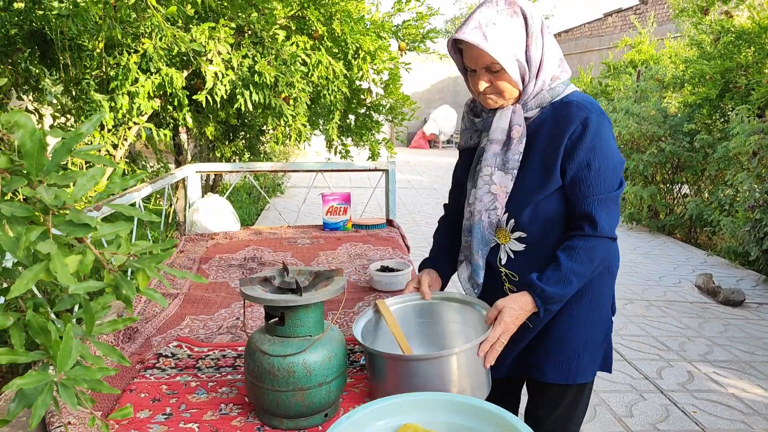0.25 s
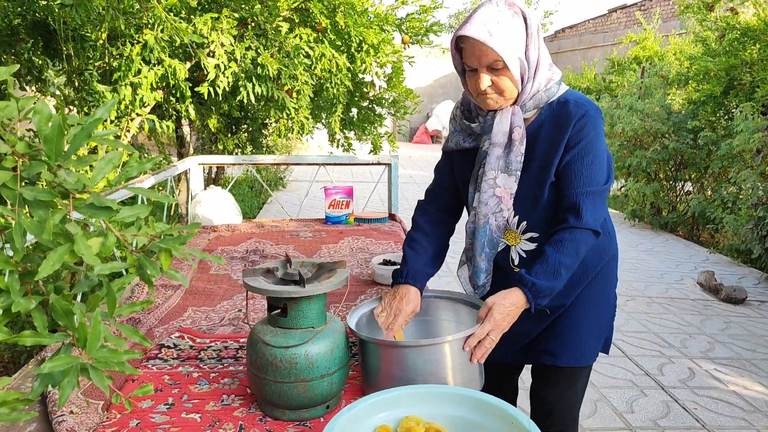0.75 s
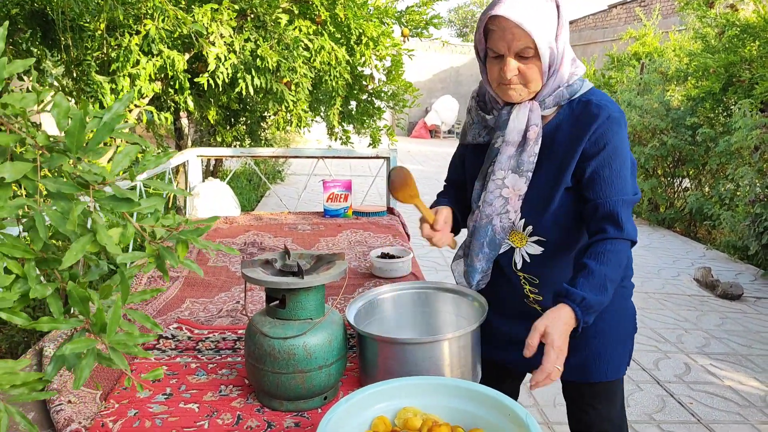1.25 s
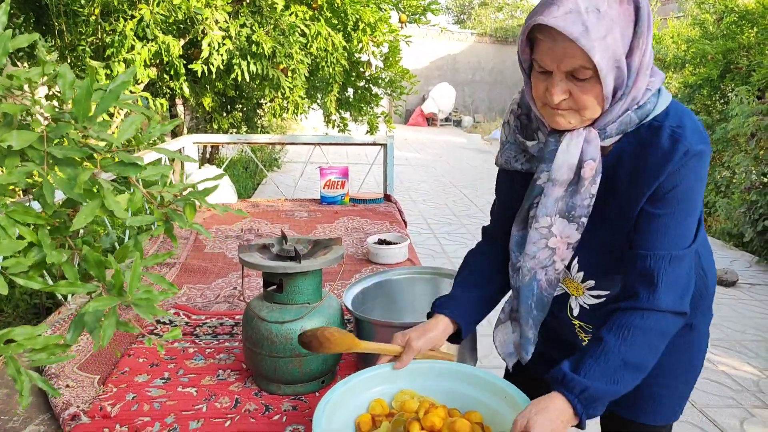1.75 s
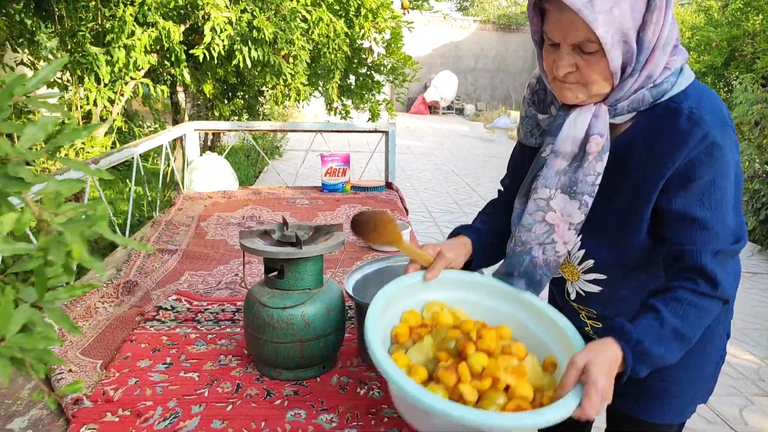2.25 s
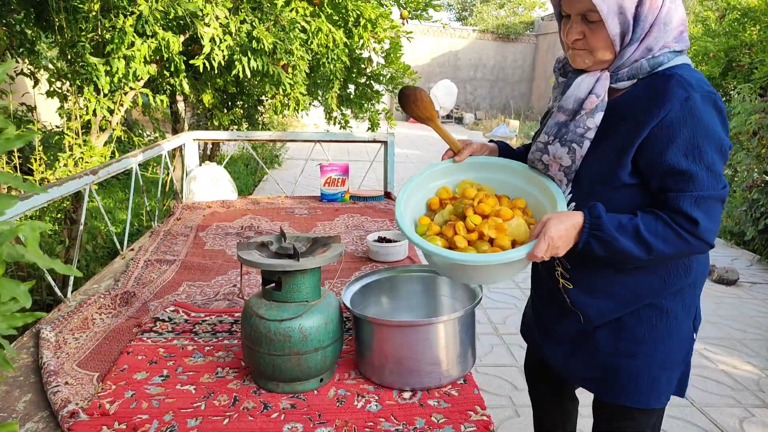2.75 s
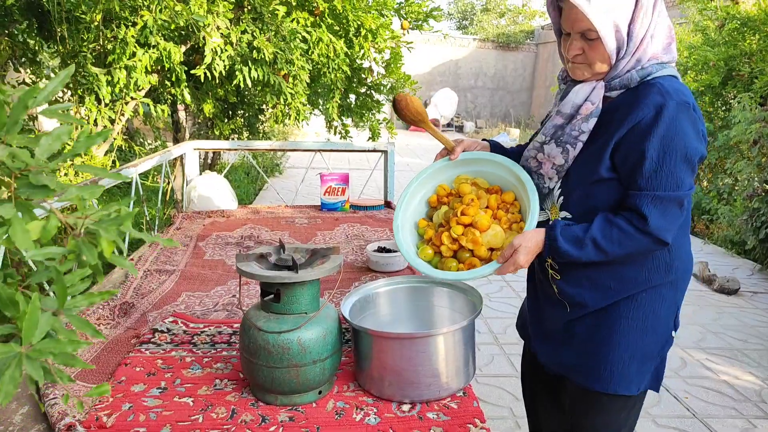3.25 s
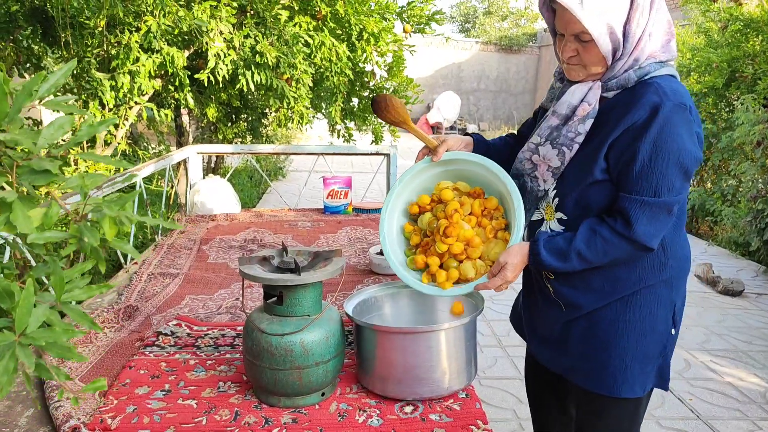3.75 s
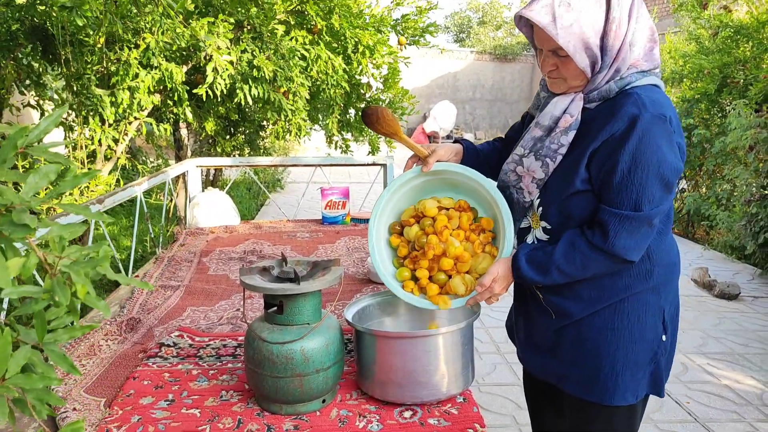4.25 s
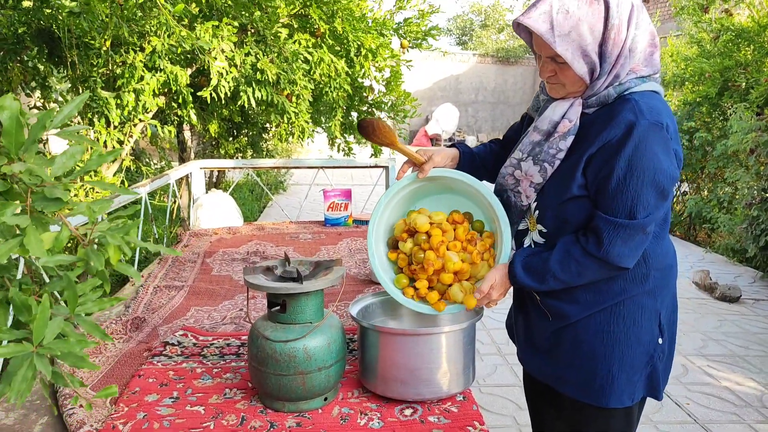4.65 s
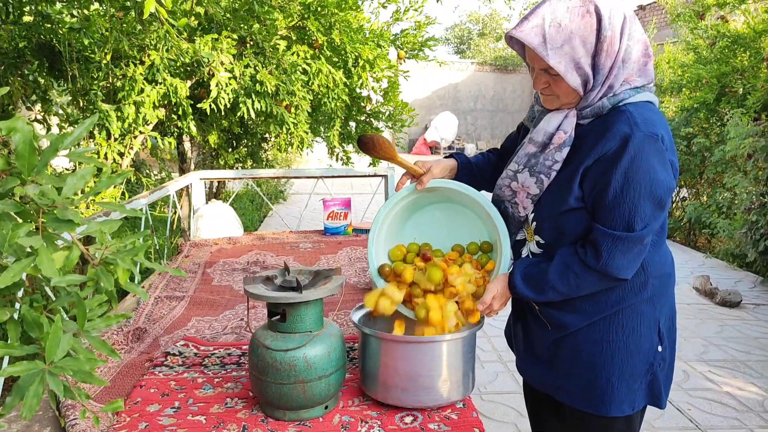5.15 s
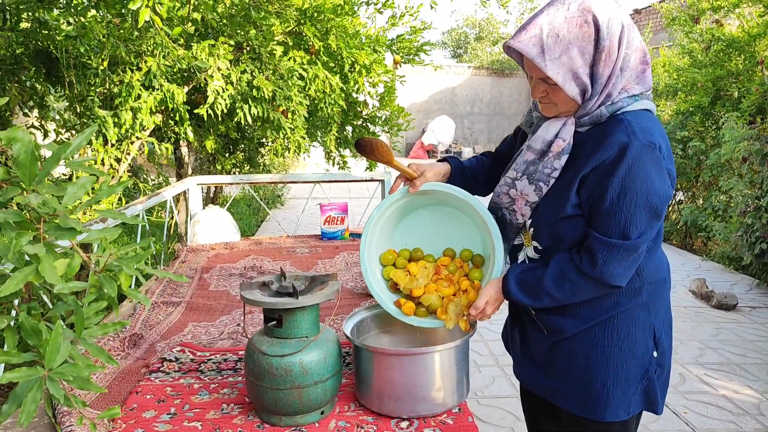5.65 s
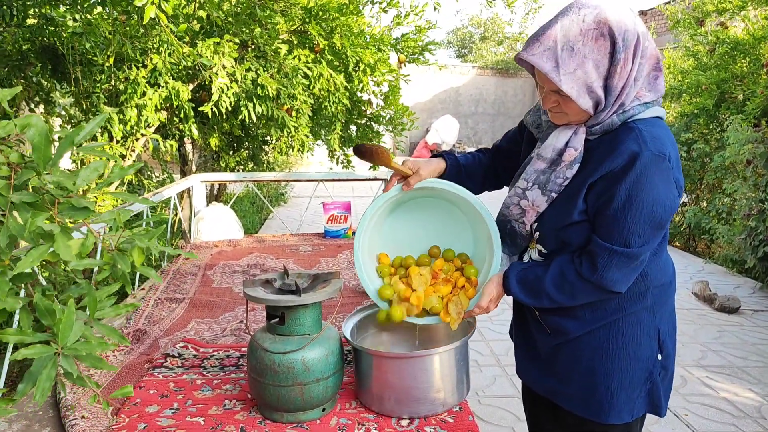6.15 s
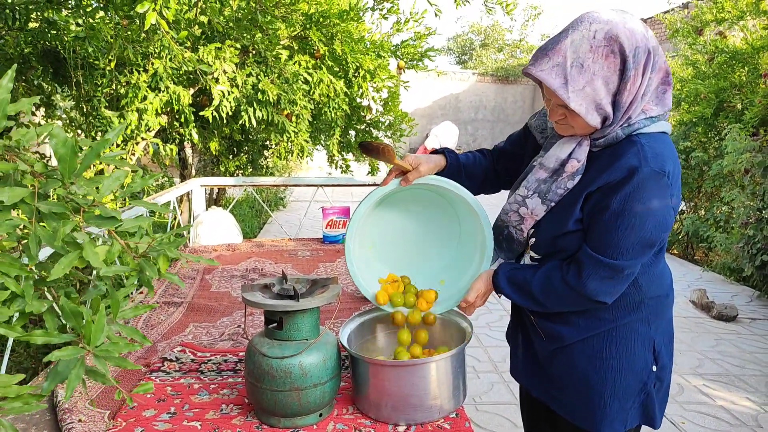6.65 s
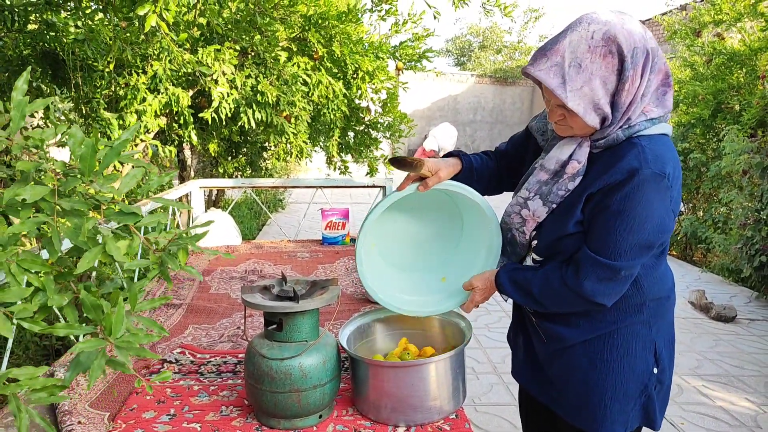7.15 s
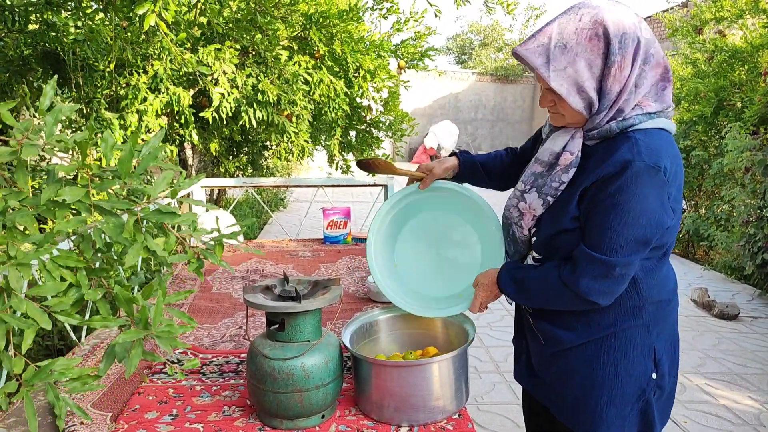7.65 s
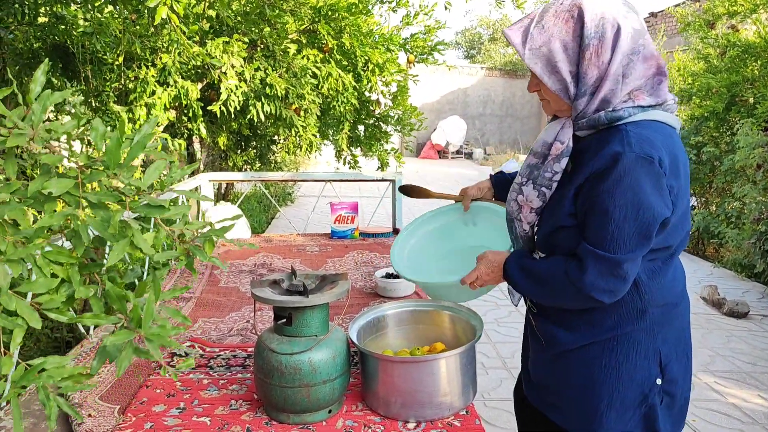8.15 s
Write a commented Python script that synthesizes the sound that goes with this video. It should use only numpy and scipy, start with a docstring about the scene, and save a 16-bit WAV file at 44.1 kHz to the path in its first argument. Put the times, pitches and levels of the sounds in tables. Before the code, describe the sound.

Steady bright gas hiss in a breezy garden, then fruit thudding into an empty metal pot in bursts, with small dry ticks and low wind thumps.

```python
"""Gas burner and fruit pot in a windy garden

A small burner hisses: shaped noise, with spans of a thinner, higher flaring hiss and a low roar.
Fruit lands in a metal pot: decaying modes knock, noise bursts splat; one bump rings the pot wall.
Small dry ticks are short sine clusters; sparse echoes follow all pot sounds.
Wind is low noise at two microphone ports plus single swings; a far rumble is nearly common to both.
"""
import sys
import numpy as np
from scipy import signal
from scipy.fft import rfft, irfft
from scipy.io import wavfile
from scipy.ndimage import uniform_filter1d

SR = 44100
rng = np.random.default_rng(int(sys.argv[2]) if len(sys.argv) > 2 else 0)


def wav_out(sig):
    """Save sig, one row per channel (or a flat mono array), as 16-bit PCM at SR to the path in sys.argv[1]."""
    wavfile.write(sys.argv[1], SR, np.round(np.clip(np.atleast_2d(sig).T, -1, 1) * 32767).astype(np.int16))


N = 369999

# Colour tables: f/Hz, density/dB per Hz, relative.
# Steady jet: t/s, level/dB in 3.5-5.5 kHz before flutter, resonance factor, extra right lag/samples
JET = [(0.0, -44, 0.98, 0.11), (0.44, -44, 0.96, 0.1), (0.47, -47, 0.87, 0.15), (2.1, -47, 0.99, 0.23),
       (2.36, -44, 0.98, 0.1), (2.71, -47, 1.0, 0.1), (2.76, -44, 1.0, 0.3), (4.21, -46.5, 0.98, 0.3),
       (4.32, -44.5, 0.99, 0.1), (4.55, -46, 1.0, 0.1), (4.58, -44.5, 1.0, 0.1), (4.67, -46, 0.98, 0.1),
       (5.16, -45, 0.94, 0.1), (5.28, -41.5, 0.94, 0.14), (5.58, -44, 0.94, 0.088),
       (5.68, -43.5, 0.95, 0.033), (7.99, -46, 1.0, 0.033), (8.04, -50, 0.98, 0.1), (8.13, -42.5, 1.0, 0.1),
       (8.25, -45.5, 1.0, 0.1), (8.39, -46.5, 0.92, 0.1)]
# Jet colour at resonance factor 1: f/Hz, density/dB
JET_COLOUR = [(1700, -22.5), (2400, -15), (3200, -20.5), (3700, -9), (4100, -5), (4500, -3), (5100, 2.5),
              (5700, -1.5), (6400, -10), (7200, -19.5), (8500, -23.5), (10500, -28.5), (11700, -33.5),
              (13200, -30.5), (15700, -33)]
# Flare spans, each of rows: t/s, level/dB in 5.7-6.9 kHz before trim, whistle re level/dB before trim,
# whistle f/Hz
FLARE = [
    [(0.2, -52, -18, 13500), (0.23, -52, -23, 13500), (0.394, -49.5, -15, 13400), (0.56, -42.5, -18, 14650),
     (0.63, -46.5, -14, 14400), (0.666, -44, -18, 14400), (0.796, -46, -14, 14100),
     (0.816, -44.5, -26, 14400), (0.84, -47, -20, 14300), (0.942, -47.5, -12, 14300),
     (0.956, -46, -18, 14200), (1.146, -45.5, -19, 14250), (1.172, -43, -15, 14700),
     (1.216, -51, -10, 13600), (1.348, -46, -14, 14100), (1.398, -53, -11, 14000),
     (1.418, -46.5, -19, 14800), (1.508, -54, -18, 13600), (1.552, -49, -31, 14100),
     (1.562, -53, -14, 13500), (1.632, -55.5, -15, 12900), (1.714, -47, -9, 14500),
     (1.888, -58.5, -12, 13350), (1.994, -53, -18, 13300), (2.0, -47, -14, 13200)],
    [(2.2, -65, -11, 13100), (2.234, -70, -10, 13300), (2.242, -62, -19, 13500), (2.276, -66, -30, 13100),
     (2.326, -44.5, -29, 13700), (2.502, -65, -29, 12700), (2.524, -50.5, -19, 12500),
     (2.676, -53, -19, 13100), (2.712, -57, -34, 13800), (2.728, -71, -7, 13500), (2.732, -62, -29, 13500),
     (2.776, -50.5, -20, 13600), (2.922, -72, -14, 13300), (3.1, -65, -31, 13300)],
    [(7.4, -51, -18, 13400), (7.408, -51, -33, 13400), (7.46, -52.5, -20, 12900), (7.75, -55.5, -18, 13900),
     (7.782, -48.5, -13, 14100), (7.888, -44, -23, 14500), (7.986, -59, -15, 13100),
     (8.044, -67, -3, 13400), (8.052, -60, -26, 13500), (8.114, -54, -15, 13500), (8.154, -51, -29, 13400),
     (8.306, -58, -16, 13300), (8.328, -52, -30, 13400), (8.384, -50, -19.5, 13600), (8.39, -64, -9, 13500)],
]
# Flare colour at a 14300 Hz whistle: f/Hz, density/dB
FLARE_COLOUR = [(1700, -27), (2100, -18.5), (2600, -21.5), (3200, -17.5), (4500, -22), (5400, -8),
                (5800, 1.5), (6150, -1), (6700, -8.5), (7600, -24.5), (8300, -16.5), (9300, -26.5),
                (10000, -26.5), (10700, -24.5), (11700, -37)]
# Whistle colour at a 14300 Hz whistle: f/Hz, density/dB
WHISTLE_COLOUR = [(12000, -32), (13200, -14), (14000, -9), (14350, -8), (14700, -10), (15200, -24),
                  (16000, -36)]
# Flame roar: t/s, level/dB in 0.6-1.4 kHz before trim
ROAR = [(0.0, -63), (0.33, -58.5), (1.56, -66), (1.87, -59), (2.85, -58.5), (3.13, -54.5), (3.57, -56.5),
        (4.06, -56), (4.51, -54.5), (4.74, -55), (5.16, -50.5), (5.35, -48.5), (5.73, -53.5), (6.36, -50.5),
        (6.73, -54), (6.87, -57), (7.1, -53), (7.62, -65), (7.85, -62.5), (8.39, -58)]
# Roar colour: f/Hz, density/dB
ROAR_COLOUR = [(300, -29), (450, -6), (600, -7.5), (850, 1), (1200, -3), (1500, -8.5), (2300, -19.5),
               (3500, -28.5)]
# Far rumble: t/s, level/dB in 200-400 Hz
RUMBLE = [ [(0.0, -56), (0.44, -50), (0.72, -56), (1.52, -53.5), (2.15, -51.5), (2.94, -51.5), (3.81, -49),
          (4.21, -50), (5.33, -46.5), (5.56, -48.5), (6.4, -47.5), (6.56, -46), (7.01, -48), (7.27, -48.5),
          (7.8, -53.5), (8.39, -53)], ][0]
# Rumble colour: f/Hz, density/dB
RUMBLE_COLOUR = [(15, -24), (30, 5.5), (60, -1), (110, -2.5), (190, 3), (270, 5), (340, -3.5), (420, -8),
                 (520, -15), (700, -19), (1000, -70)]
# Wind on the ports: t/s, level/dB in 20-150 Hz before trim and lumps, left minus right/dB
WIND = [(0.0, -62, 5), (0.07, -40.5, -13.0), (0.14, -60, 9), (0.18, -40, -15.0), (0.37, -41, -9),
        (0.4, -52, -6.0), (0.44, -37, -18.5), (0.51, -54, 21), (0.54, -55, -14.0), (0.56, -37, -23),
        (0.63, -38, -14), (0.7, -61, -10), (0.79, -40, -2), (0.86, -42, -18), (0.91, -47, -1),
        (0.98, -50, -10), (1.03, -44.5, 20), (1.26, -47, -2), (1.33, -47.5, 10.5), (1.78, -65, 5),
        (2.08, -65, -0.5), (2.15, -40, -19), (2.19, -44, -2), (2.38, -48, 22), (2.55, -54, 2),
        (2.59, -67, -3.5), (2.66, -58, 4.0), (2.87, -60, -4), (2.99, -50, -12), (3.08, -61, 2.0),
        (3.39, -46.5, 8), (3.46, -53, 2), (3.55, -53, -7), (3.83, -56, -3), (3.95, -49, -8), (4.09, -61, 7),
        (4.3, -54, 0.5), (4.53, -72, 0), (4.58, -36, 22.0), (4.6, -35, 23.0), (4.65, -53, 14),
        (4.7, -43, 16), (4.74, -34, 9.5), (4.79, -32, 5), (4.91, -34.5, 6.5), (4.95, -34, 14),
        (5.09, -41, 13.5), (5.12, -56, 13), (5.28, -47.5, 9), (5.56, -49, 13), (5.61, -57, 2.5),
        (5.82, -56, 12), (5.96, -38.5, 14), (5.98, -34, 23.0), (6.03, -32.5, 17), (6.12, -30.5, 25),
        (6.17, -35, 9), (6.22, -38, 15), (6.31, -36, -7), (6.4, -41.5, -4), (6.47, -31, 9),
        (6.61, -41.5, 5.5), (6.63, -36, 17), (6.82, -32.5, 12), (6.92, -36, 28), (6.94, -49, 14.5),
        (6.99, -27, 19), (7.03, -39, 18), (7.12, -31.5, 23.5), (7.2, -36.5, 16), (7.24, -32.5, 6),
        (7.29, -49, -1), (7.36, -64, 7), (7.43, -38.5, 27), (7.48, -45, 21), (7.62, -34.5, 23),
        (7.67, -49.5, -3), (7.74, -47.5, -1.5), (7.83, -51, 10), (7.87, -33, 21.0), (7.92, -49, 14.0),
        (7.97, -33, 9), (8.06, -50, 6), (8.11, -41.5, -8), (8.18, -48.5, -4), (8.34, -62, -2.5),
        (8.39, -45, -13)]
# Wind colour at a -40 dB table level: f/Hz, density/dB
WIND_COLOUR = [(9, -29), (20, -0.5), (70, 0), (110, -7), (160, -11.5), (220, -23), (300, -26.5), (450, -44),
               (900, -93)]
# Wind pops: start t/s, gain/dB, pitch f/Hz, left minus right/dB
POPS = [(0.193, -28, 104, -22), (0.263, -28, 169, -24), (0.349, -27, 158, -25), (0.424, -20, 108, -27),
        (1.019, -29, 56.5, 17.5), (1.138, -33, 80.7, 18), (4.58, -23.5, 104, 24), (5.973, -19, 85.3, 30),
        (6.028, -40, 57.7, 10.5), (6.087, -40, 94.2, 15.5), (6.828, -33, 80.7, 17), (7.858, -21, 77, 25),
        (7.949, -16.5, 84, 22)]
# Port pair: f/Hz, likeness/0-1 before "alike", left lead/rad, left minus right/dB before "alike"
PORTS = [(61, 0.76, 0, 4.5), (157.7, 0.6, -5, 2.5), (318, .995, 0.63, -5.4), (550, 0.74, 0.74, 1.5),
         (850, 1, -1.25, 2), (1300, 0.65, 0.5, -3), (2500, 0.33, 2, -0.5), (3120, 0.44, 7.3, 2.5),
         (3830, 0.94, -0.1, 1.5), (4470, 1, 1.59, -1), (5230, 0.92, 2.5, -9), (5370, 0.71, 4, -3),
         (5860, 0.87, 3.5, -6.5), (6380, 0.6, 4.5, 0), (7400, 0.64, 9.5, 6.5), (8220, 0.8, 10, -2),
         (10340, 0.3, 17, 6), (11600, 0.5, 16, -1), (13000, 0.5, 12, -6), (14150, .45, 24, -7),
         (14800, 0.6, 23, 1)]
# Fruit landings: t/s, knock peak/dB, hardness/dB per octave, time until waves meet/ms,
# pitch factor, ring length factor, splat level/dB
FRUIT = [(3.963, -18, -7, 4.13, 1.03, 0.4, -68), (4.2535, -20, -1.5, 3.7, 1.01, 0.67, -64),
         (4.2895, -21, 1.5, 4, 1.05, 0.78, -59), (4.313, -23.5, 6, 2.5, 0.81, 0.68, -66),
         (4.4016, -12, -2, 1.9, 0.93, 1.0, -57.5), (4.4311, -9.5, -4.5, 4.8, 1.02, 0.91, -65),
         (4.463, -28.5, -5, 3.6, 0.84, 1.0, -74), (4.648, -37, 8, 2.8, 0.93, 1.0, -66),
         (4.911, -13, 1.5, 5.13, 1.02, 0.85, -64), (5.045, -25.5, -4, 2.2, 0.87, 1.0, -66),
         (5.169, -23, 1, 2.2, 0.73, 1, -66), (5.185, -17.5, 2.5, 1.75, 0.89, .9, -60),
         (5.217, -22, 6.5, 2.6, 1.1, 1.0, -58), (5.236, -12.5, 6.5, 1.96, 0.825, 0.84, -46.5),
         (5.267, -26, -6, 3.24, 0.87, 0.9, -62), (5.2855, -19, 5, 5.3, .97, 0.88, -49),
         (5.33, -23, 10.5, 2.9, 0.64, 0.89, -64), (5.381, -30, 7, 5.8, 0.63, 0.85, -57),
         (5.4328, -16.5, 4, 2.6, 1.14, 1.0, -67), (6.767, -25.5, -3, 3.1, .7, 0.62, -55)]
# Pot floor modes before pitch, hardness and ring factors: f/Hz, level/dB, t60/s
POT_FLOOR = [(352, -19, 0.059), (518, 0, .022), (564, 12, 0.019), (698.4, 11.5, 0.033), (853, 2, 0.03),
             (856, 0, 0.0099), (1115, -6, 0.044), (1295, -4, .045), (1477, -14.5, 0.042),
             (1843, -10, 0.032), (2226, -13.5, .025), (2960, -23, 0.049), (3640, -17.5, 0.028)]
# Splat colour: f/Hz, density/dB
SPLAT_COLOUR = [(800, -17), (2000, 5), (4500, -1.5), (7000, -1.5), (9500, 2), (12000, -12), (14000, -12),
                (16000, -10)]
# Wall bump: t/s, peak/dB
BUMP = [(6.767, -20)][0]
# Pot wall modes before ring factor: f/Hz, level/dB, t60/s
POT_WALL = [(227.4, 1.5, 0.33), (450, -25, 0.81), (639, -20, 0.5), (696, -20, 0.051), (1400, -34, 1.4)]
# Dry ticks of spoon, basin and fruit stones: t/s, peak/dB, third partial f/Hz, t60/s
TICKS = [(1.891, -42, 830, 0.018), (1.908, -38, 1440, 0.023), (3.442, -37, 1600, 0.014),
         (3.916, -42, 1900, 0.031), (4.942, -40, 746, .025), (5.048, -38, 2180, .02),
         (5.915, -28, 1740, 0.016), (6.002, -48, 9200, .02), (6.117, -40, 2030, .02),
         (6.233, -42, 890, .025), (6.447, -55, 8800, 0.0073), (6.497, -31.5, 1750, 0.02),
         (6.659, -44, 1020, 0.026), (6.762, -44, 9900, 0.019), (6.824, -40, 1320, 0.027),
         (7.646, -33.5, 1200, 0.024)]


def gain_of(db):
    """Decibels to amplitude gain."""
    return 10 ** (np.asarray(db) / 20)


def evened(x):
    """Scale to rms 1."""
    return x / np.sqrt(np.mean(x ** 2) + 1e-20)


def read(points, hz, order=1):
    """Interpolate one spectrum column, linear on a log-frequency axis."""
    table = np.transpose(points)
    return np.interp(np.log(hz + 1), np.log(table[0] + 1), table[order])


def follow(rows, t_s):
    """Interpolate all columns of a time table at t_s."""
    row_s, *columns = np.transpose(rows)
    return [np.interp(t_s, row_s, column) for column in columns]


def add(mix, start_s, sound):
    """Add a two-channel sound in place, cut at the end of the mix."""
    part = mix[:, max(round(start_s * SR), 0):][:, :sound.shape[1]]
    part += sound[:, :part.shape[1]]


def panned(x, pan_db):
    """Split by left/right ratio; the port mean keeps the level of x when one port takes nearly all."""
    left, right = gain_of(pan_db / 2), gain_of(-pan_db / 2)
    return 2 * x * np.array([left, right]) / np.hypot(left, right)


def noise(colour, band_hz, size, shift=lambda t_s: 1 + 0 * t_s, lag_samples=lambda t_s: 0 * t_s,
          patchy_db=0., streaky_db=0., alike=0.8):
    """Random short-time spectra through the port pair; port mean has rms 1 in band; shift slides colour."""
    hop = size // 4
    hz = np.fft.rfftfreq(size, 1 / SR)[:, None]
    t_s = np.arange(N // hop + 5) * hop / SR
    a, b, c, d, patches, streaks = rng.standard_normal((len(t_s), len(hz), 6)).T
    # axis 0 is frequency, axis 1 time: streaks are narrow and lasting
    patches = uniform_filter1d(patches, size=8, axis=0)
    patches = evened(uniform_filter1d(patches, size=16, axis=1))
    streaks = uniform_filter1d(streaks, size=3, axis=0)
    streaks = evened(uniform_filter1d(streaks, size=120, axis=1))

    same = np.clip(alike * read(PORTS, hz), 0, 1)
    lead_rad = read(PORTS, hz, order=2) + 2 * np.pi * hz * lag_samples(t_s) / SR
    tilt = gain_of(alike * read(PORTS, hz, order=3) / 2)
    left = a + 1j * b
    right = same * left * np.exp(-1j * lead_rad) + np.sqrt(1 - same ** 2) * (c + 1j * d)
    spectra = np.array([left * tilt, right / tilt])
    spectra *= gain_of(read(colour, hz / shift(t_s)) + patchy_db * patches + streaky_db * streaks)

    inside = (hz >= band_hz[0]) & (hz <= band_hz[1])
    full, part = (signal.istft(z, nperseg=size, noverlap=size - hop)[1][:, :N]
                  for z in (spectra, spectra * inside))
    return full / np.sqrt(np.mean(part.mean(0) ** 2))


def flutter(rate_hz):
    """Low-passed random curve of rms 1; half amplitude at rate_hz."""
    hz = np.fft.rfftfreq(N, 1 / SR)
    return evened(irfft(rfft(rng.standard_normal(N)) / (1 + (hz / rate_hz) ** 2), N))


def burner():
    """Turbulent gas rings nozzle and burner head: steady jet, flare with pitched whistle, flame roar."""
    t_s = np.arange(N) / SR
    jet = noise(JET_COLOUR, (3500, 5500), size=1024, shift=lambda s: follow(JET, s)[1],
                lag_samples=lambda s: follow(JET, s)[2], patchy_db=1.7, streaky_db=2.5)
    jet *= gain_of(follow(JET, t_s)[0] + 0.4 * flutter(10.4))

    rows = [row for span in FLARE for row in span]
    level_db, whistle_db, _ = follow(rows, t_s)

    def slide(s):
        return follow(rows, s)[2] / 14300

    flare = noise(FLARE_COLOUR, (5700, 6900), size=1024, shift=lambda s: slide(s) ** 0.73,
                  patchy_db=2.15, streaky_db=1.5)
    whistle = noise(WHISTLE_COLOUR, (13300, 15500), size=512, shift=slide)
    flare += whistle * gain_of(whistle_db - 1.0)
    burning = sum((t_s > span[0][0]) & (t_s < span[-1][0]) for span in FLARE)
    fade = uniform_filter1d(1. * burning, size=4000)
    flare *= gain_of(level_db - 1.5 + 0.93 * flutter(25.)) * fade

    roar = noise(ROAR_COLOUR, (600, 1400), size=1024, patchy_db=2.5)
    roar *= gain_of(follow(ROAR, t_s)[0] - 1.18)
    return jet + flare + roar


def rumble():
    """Far, low wash; its waves are so long that both ports hear nearly the same."""
    wash = noise(RUMBLE_COLOUR, (200, 400), size=2048, patchy_db=1.04, alike=0)
    shared = wash.mean(0)
    level_db = follow(RUMBLE, np.arange(N) / SR)[0]
    return (shared + .08 * (wash - shared)) * gain_of(level_db)


def wind():
    """Lumpy pressure, unrelated at the ports, brighter in strong gusts; single swings where an eddy bursts."""
    level_db, pan_db = follow(WIND, np.arange(N) / SR)

    def brighter(s):
        return 2 ** (0.023 * (follow(WIND, s)[0] + 40))  # octaves per dB of gust

    lumps = gain_of(1.93 * np.array([flutter(21.0), flutter(13.0)]))
    gusts = noise(WIND_COLOUR, (20, 150), size=1024, shift=brighter, alike=0)
    out = panned(gusts * gain_of(level_db - 5.0) * lumps, pan_db)
    for start_s, pop_db, hz, pop_pan_db in POPS:
        cycles = np.arange(-.018, .04, 1 / SR) * hz  # from the envelope peak, 18 ms after the start
        swing = -np.cos(2 * np.pi * cycles + 0.77) * np.exp(-abs(cycles / 0.32) ** 1.3)
        add(out, start_s, panned(gain_of(pop_db) * swing, np.full(len(cycles), pop_pan_db)))
    return out


def rung(modes, bright_db, focus_ms, pitch, ring, t_s):
    """Decaying modes in phase at focus_ms, as waves meet in a round pot; peak 1."""
    body = 0
    for hz, db, t60_s in modes:
        level_db = db + bright_db * np.log2(hz / 700) - 60 * t_s / (t60_s * ring)
        body = body + gain_of(level_db) * np.cos(2 * np.pi * hz * pitch * (t_s - focus_ms / 1000))
    body = body * np.minimum(t_s / .0012, 1)  # soft flesh takes a moment to load the metal
    return body / abs(body).max()


def pot():
    """Fruit knocks the pot floor and splats; small things tick; one bump rings the wall."""
    out, t_s = np.zeros((2, N)), np.arange(4000) / SR
    both = np.ones((2, 1))
    spray = noise(SPLAT_COLOUR, (7500, 12000), size=256, alike=0.3)
    for start_s, peak_db, bright_db, focus_ms, pitch, ring, splat_db in FRUIT:
        knock = gain_of(peak_db) * rung(POT_FLOOR, bright_db, focus_ms, pitch, max(ring, .2), t_s)
        burst = np.minimum(t_s / 0.0016, 1) / (1 + (t_s / 0.016) ** 6.3)  # juice sprays briefly
        splat = gain_of(splat_db) * burst * spray[:, round(start_s * SR):][:, :len(t_s)]
        add(out, start_s, knock + splat)

    for start_s, peak_db, hz, t60_s in TICKS:
        tick = sum(np.sin(2 * np.pi * hz * ratio * t_s) for ratio in (.58, .77, 1.0, 1.22))
        tick = tick * gain_of(-60 * t_s / t60_s) * np.minimum(t_s / 0.0014, 1)
        add(out, start_s, gain_of(peak_db) * tick / abs(tick).max() * both)

    held_s = 0.1  # until the settling fruit stops the ring
    wall = rung(POT_WALL, 0, 3.25, 1, 0.81, t_s) / (1 + (t_s / held_s) ** 7.4)
    bump_s, bump_db = BUMP
    add(out, bump_s, gain_of(bump_db) * wall * both)
    return out


def garden(x):
    """Sparse echoes from table, paving and wall, partly shared by the ports; lows spread away."""
    t_s, t60_s = np.arange(6000) / SR, 0.071
    taps = rng.standard_normal((6000, 3)).T * (rng.random((6000, 3)).T < .05)
    taps = taps * gain_of(-60 * t_s / t60_s) * (t_s > .003)
    high_pass = signal.butter(2, 400, "high", fs=SR, output="sos")
    taps = signal.sosfilt(high_pass, taps[2] + 0.84 * taps[:2])
    return signal.fftconvolve(x, taps / np.linalg.norm(taps[0]), axes=1)[:, :N]


def scene():
    """Sum of all sources at the ports, plus echoes of the pot."""
    knocks = pot()
    return burner() + rumble() + wind() + knocks + gain_of(-9.0) * garden(knocks)


def record(dry):
    """Linear-phase low-pass: the band limit."""
    edge_hz = 15730
    edge = signal.firwin(1023, edge_hz, window=("kaiser", 9), fs=SR)
    return signal.oaconvolve(dry, edge[None], "same")


dry = scene()
out = record(dry)
wav_out(out)
```